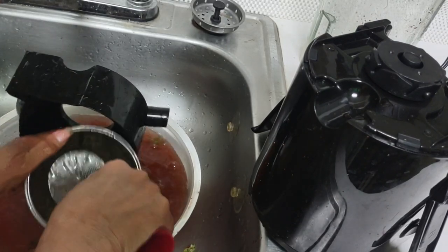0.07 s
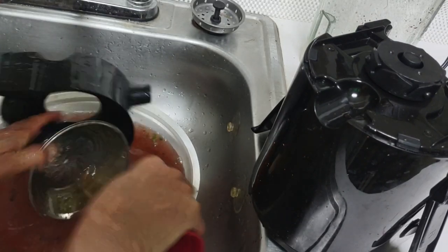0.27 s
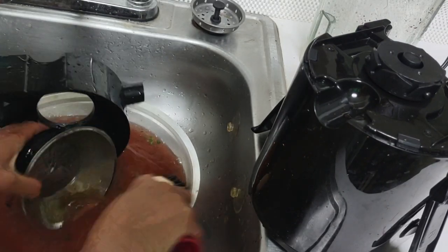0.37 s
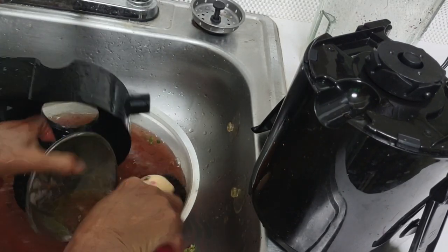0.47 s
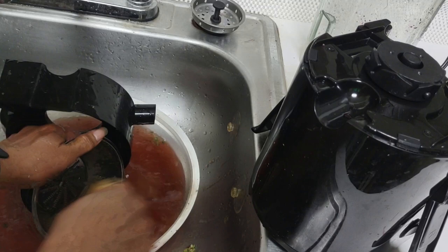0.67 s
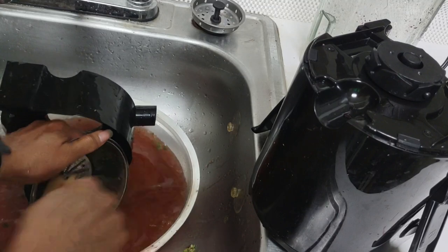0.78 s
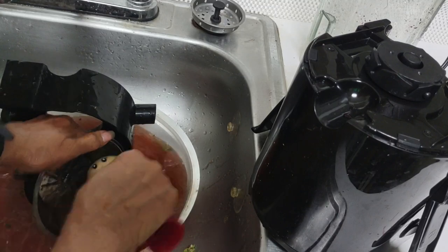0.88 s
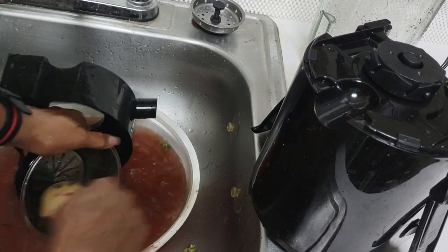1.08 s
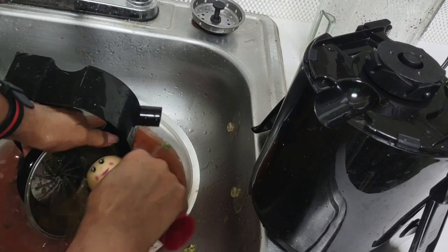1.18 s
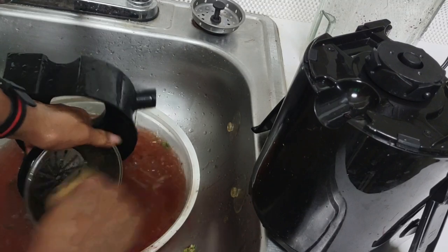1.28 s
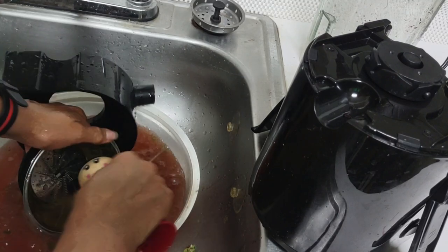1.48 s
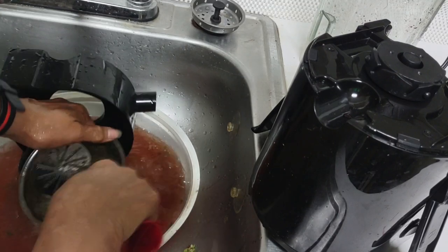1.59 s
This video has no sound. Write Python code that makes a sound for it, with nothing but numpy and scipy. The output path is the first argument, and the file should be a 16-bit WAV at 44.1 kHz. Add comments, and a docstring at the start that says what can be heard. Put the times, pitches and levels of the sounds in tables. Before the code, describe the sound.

A mesh basket is scrubbed by hand in a water-filled plastic basin inside a steel sink; hollow thumps and a loud early knock, then softer bumps, small sloshes, bubbles and short brush hisses, heard close, stronger on the right.

```python
"""Bristles hiss in strokes: a brush scrubs a mesh basket in a plastic basin of water in a steel sink.
Dense random flicks make the hiss; slips and bumps drive ringing modes of sink, basin, parts and basket.
Water churns as tiny ringing bubbles over gritty noise; single bubbles are dying sines, most rising in pitch.
The sink reverberates by feedback delays; the microphone's right side faces the work."""
import sys
import numpy as np
from scipy import signal
from scipy.fft import rfft, irfft
from scipy.io import wavfile

SR = 44100
rng = np.random.default_rng(int(sys.argv[2]) if len(sys.argv) > 2 else 0)


def store_wav(level_fs):
    """Save 16-bit WAV to argv[1]."""
    pcm = np.round(np.clip(np.atleast_2d(level_fs), -1, 1) * 32767)
    wavfile.write(sys.argv[1], SR, pcm.T.astype(np.int16))


N = 72765  # samples

# All table levels are relative, ahead of the *_DB trims.
# bristle hiss, three stretches: t/s, level/dB, top/dB, body/dB
BRUSH_STRETCHES = [
    [(0.0, -48, 3.5, 4.5), (0.02, -52.5, -3.5, -7.5), (0.042, -44, 1, -13), (0.062, -42, -7, -2),
     (0.078, -43.5, -6, -20), (0.116, -52.5, -3, 4), (0.136, -52.5, -0.5, -4), (0.174, -65.5, -11, 12),
     (0.2, -68.5, -9, 8), (0.236, -57.5, -17, 5.5)],
    [(0.41, -67.5, -9, 3), (0.464, -69, 6, 12), (0.522, -60, -4.5, -3), (0.54, -74, -9, -3),
     (0.578, -82, -5, 1), (0.618, -63.5, -26, 14), (0.65, -85, -20, 15), (0.654, -70.5, 1, 7),
     (0.714, -79, -5, 3.5), (0.764, -51.5, -10, -13), (0.782, -52, -3.5, -0.5), (0.838, -38.5, -6.5, -2),
     (0.898, -69.5, -6, 9), (0.962, -41.5, -12, 0), (0.98, -42, -13, 0), (1.0, -55, -6, -2)],
    [(1.0, -56.5, -9, 3), (1.058, -66, -12, 1), (1.11, -53.5, -3, 12), (1.122, -61, -9, 6),
     (1.164, -51, -18, 4.5), (1.218, -75, -5, -3), (1.244, -58, 0.5, 1), (1.274, -43.5, -5.5, -2.5),
     (1.356, -52.5, -4.5, -14.5), (1.384, -66.5, -9, 3), (1.416, -38, -6, -3.5), (1.488, -63, -12, -1),
     (1.522, -62.5, -3, -8), (1.544, -45.5, -5, -1), (1.576, -45, -5, -9), (1.65, -66.5, -3, -11)],
]
# bristle spectrum: f/Hz, density/dB per Hz
BRISTLE_SPECTRUM = [(590, -62), (1000, -2), (1260, -15.5), (1450, -1.5), (1590, -7), (2480, -1), (3810, -9),
                    (4320, -4), (9140, -7), (10700, -13.5), (15700, -8.5)]
FLICKS_PER_S, FLICK_SPREAD_DB, BRUSH_DB = 12000, 1.5, 3.5
SNAG_HZ, SNAG_DB = 69, 2  # bandwidth, rms swing

# parts dragging: t/s, boom/dB, ring/dB
DRAG_CURVE = [(0.0, -55, -59), (0.032, -59, -67), (0.09, -27.5, -28.5), (0.136, -41.5, -56),
              (0.16, -33, -34.5), (0.216, -44, -38.5), (0.252, -25, -16.5), (0.306, -29, -29.5),
              (0.33, -28, -40), (0.352, -24.5, -23.5), (0.426, -31.5, -39), (0.45, -21.5, -33),
              (0.592, -55.5, -71), (0.61, -57, -54), (0.638, -34.5, -52), (0.666, -35.5, -43),
              (0.752, -34, -40), (0.79, -41.5, -45.5), (0.836, -36, -35), (0.932, -36.5, -69),
              (0.978, -35, -41.5), (1.06, -45.5, -44), (1.098, -25.5, -35), (1.12, -30, -43),
              (1.222, -37, -56.5), (1.272, -39, -43.5), (1.446, -34.5, -43), (1.52, -68, -63),
              (1.566, -37, -53), (1.65, -72, -73)]
SLIPS_PER_S, SLIP_SPREAD_DB, DRAG_DB = 600, 2, -6.5

# bumps: t/s, ring/dB, boom/dB, clatter/dB, basket/dB, crack/dB
BUMP_LIST = [(0.082, -33, -37, -40.5, -58, -49), (0.157, -29.5, -44, -43.5, -59, -60),
             (0.222, -39, -28, -42.5, -54.5, -56), (0.245, -36, -32, -21, -21, -29.5),
             (0.248, -7, -23.5, -32, -39, -54), (0.253, -12, -23, -34, -26, -52),
             (0.33, -30, -22.5, -34, -50, -64), (0.349, -15, -28, -33, -45, -52),
             (0.384, -23.5, -36, -33, -44, -42.5), (0.432, -43, -22, -48, -67, -58.5),
             (0.443, -23, -19, -47, -71, -68), (0.463, -59, -22, -34.5, -68, -61),
             (0.601, -70, -72, -62, -61, -55), (0.612, -30.5, -30, -40.5, -48, -51),
             (0.635, -31.5, -30, -43, -66, -69), (0.655, -50, -33.5, -62, -68, -61),
             (0.707, -30, -29, -50, -68, -65), (0.744, -30, -35, -59, -65, -59),
             (0.756, -39, -32.5, -52, -59, -61), (0.824, -36, -35, -38, -40, -48),
             (0.895, -36.5, -65, -47, -67, -59), (1.086, -33.5, -36, -43.5, -63, -59),
             (1.1, -58, -24, -50, -57, -48), (1.123, -27, -27.5, -47, -59, -57),
             (1.139, -34.5, -38, -48, -64, -47.5), (1.315, -34, -50, -50, -51, -52.5),
             (1.357, -31.5, -38, -51, -65, -62), (1.414, -46, -35, -50, -47, -38),
             (1.436, -42, -39, -48.5, -43, -55), (1.543, -49, -41.5, -56.5, -42, -42)]
# sink floor modes: f/Hz, level/dB, t60/s
SINK_MODES = [(119.1, 3, .1), (146.8, 1.5, 0.08), (199, -2.5, 0.085), (81, -11, 0.023), (252.3, -10, 0.037)]
# basin modes: f/Hz, level/dB, t60/s
BASIN_MODES = [(397, 2, 0.11), (317.9, -3, .1), (371.4, -8.5, 0.082), (491, -9.5, 0.027),
               (533, -17.5, 0.21), (691.2, -23.5, 0.18), (889, -15, 0.036)]
# plastic part modes: f/Hz, level/dB, t60/s
PART_MODES = [(917, -6, .04), (1183, -13.5, 0.074), (1318, -9, 0.027), (1430, -17.5, .04),
              (1612, -5, 0.039), (1890, 1, 0.013), (2048, -14.5, 0.03), (2357, -9, 0.043),
              (2800, -16.5, 0.034)]
# mesh basket modes: f/Hz, level/dB, t60/s
BASKET_MODES = [(2950, -6, .06), (3060, -2, .08), (3160, -1, .13), (3270, -1, .15), (3380, -3, .15),
                (3500, -5, .13), (3770, -8, .07), (4340, -8, .08), (4910, -11, .07), (6100, -12, .06)]
# crack spectrum: f/Hz, density/dB per Hz
CRACK_SPECTRUM = [(1760, -21), (3000, 0.5), (3400, -1.5), (3770, -4.5), (5630, -18.5), (6160, -8.5),
                  (15700, -46)]
BOOM_DB, RING_DB, CLATTER_DB, BASKET_DB = -2.5, -5.5, -4, -13.5
SPLASH_DB, SPLASH_S, CRACK_DB, CRACK_S = -2.5, 0.01, 1, 0.0075  # levels, decay constants
SOFT_HZ, STRIKE_SPREAD_DB = 1200, 2.5
CONTACT_S, CONTACT_HZ = 0.0025, 7500

# single bubbles: t/s, peak/dB, start pitch/Hz, rise/octaves, t60/s (5 ms at least)
BUBBLE_LIST = [(0.055, -39, 2480, 0.37, 0.025), (.08, -30, 698, 0.11, 0.036),
               (.164, -34.5, 2086, 0.66, 0.041), (.172, -46, 490, 0.63, 0.13), (.204, -41, 1810, 0.26, .04),
               (.221, -31, 693, 0.11, 0.049), (.444, -33.5, 577, 0.31, 0.085),
               (0.467, -35, 1686, 0.024, 0.046), (.59, -55, 3140, 0.45, 0.058),
               (0.601, -34.5, 2550, 0.35, 0.015), (.642, -40, 954, 0.06, 0.044),
               (.718, -46, 700, 0.18, 0.037), (0.766, -39.5, 1200, 1, 0.059), (.79, -41, 2490, 0.27, 0.037),
               (0.828, -39, 1455, 0, 0.043), (0.851, -32, 2430, 0., 0.02), (.89, -39, 1200, 0.18, .03),
               (.897, -38, 650, 0.19, 0.064), (0.965, -50, 1410, 0, 0.032), (0.998, -41, 900, 0.027, 0.036),
               (1.068, -44, 1800, 0.33, 0.032), (1.088, -36, 1300, 0.27, 0.029),
               (1.109, -31.5, 3040, 0, 0.012), (1.266, -36.5, 2530, 0, .05), (1.27, -46, 519, 0, 0.034),
               (1.31, -37.5, 765, 0.036, 0.046), (1.335, -51, 1780, 0.039, 0.057),
               (1.406, -38, 2460, 0.14, 0.071), (1.445, -41, 686, 0.13, 0.077),
               (1.542, -36.5, 2060, 0.28, 0.028), (1.615, -44.5, 3000, 0.35, 0.026)]
RISE_S = 0.026

# water and grit churning: t/s, level/dB
SLOSH_CURVE = [(0.0, -64), (0.026, -71), (0.09, -44), (0.136, -62), (0.16, -41), (0.21, -48.5),
               (0.252, -32), (0.298, -42.5), (0.39, -35.5), (0.426, -46.5), (0.454, -39), (0.574, -102),
               (0.62, -45), (0.694, -62), (0.72, -44), (0.818, -59), (0.83, -47.5), (0.886, -55.5),
               (0.896, -48), (0.932, -56), (0.968, -47.5), (1.034, -59.5), (1.13, -42.5), (1.236, -68),
               (1.272, -43.5), (1.382, -62), (1.446, -47), (1.52, -84), (1.548, -55), (1.65, -71)]
# wash and splash spectrum: f/Hz, density/dB per Hz
WASH_SPECTRUM = [(290, -40), (500, -3.5), (538, -1), (572, -11.5), (807, -13), (2330, -15.5), (3390, -34),
                 (6000, -33.5), (7800, -69), (13200, -120)]
FIZZ_PER_S, FIZZ_CYCLES, FIZZ_SHARE, SLOSH_DB = 500, 11.6, 0.4, -1.9  # cycles to -60 dB

# room hush spectrum: f/Hz, density/dB per Hz
HUSH_SPECTRUM = [(30, -8), (160, 0), (340, -8), (540, -6), (700, -22), (4000, -29), (8000, -32),
                 (15700, -36)]
HUSH_DB = -60

# left side shading: f/Hz, level against right/dB
LEFT_SHADING = [(60, 1.5), (200, -2.5), (400, -1.5), (700, -5.5), (1290, -14), (2380, -10), (4400, -13.5),
                (8120, -14), (15000, -0.5)]
# power share reaching the left directly: f/Hz, share/0-1
DIRECT_SHARE = [(60, 1.), (450, .99), (700, .9), (1400, .35), (3100, .4), (6800, .25), (15000, .2)]
LEFT_LAG_S, SCATTER_S = 0.00019, 0.005
SINK_T60_S, SINK_DB, WALL_CUT_HZ = 0.38, -17.5, 3900  # t60 before wall dulling
BASS_CUT_HZ, CUTOFF_HZ = 66, 16150


def from_db(db):
    """Decibels to gain."""
    return 10 ** (np.asarray(db) / 20)


def rms_one(x):
    """Scale to unit power."""
    return x / np.sqrt(np.mean(x ** 2) + 1e-20)


def in_time(rows):
    """Columns of a curve, one value per sample."""
    s, *columns = np.transpose(rows)
    return [np.interp(np.arange(N) / SR, s, c) for c in columns]


def at_hz(points):
    """A spectrum table read at every transform bin, on a log frequency axis."""
    hz, value = np.transpose(points)
    bin_hz = np.arange(N + 1) * SR / (2 * N)
    return np.interp(np.log(bin_hz + 1), np.log(hz), value)


def colour(x, gain):
    """Filter by a gain per bin."""
    return irfft(rfft(x, 2 * N) * gain)[..., :N]


def lowpass(x, hz):
    """Second-order low-pass."""
    return signal.lfilter(*signal.butter(2, hz, fs=SR), x)


def grains(per_s, spread_db):
    """Random clicks of uneven size and sign; unit power."""
    sizes = from_db(spread_db * np.minimum(rng.exponential(1, N), 5))
    sizes = sizes * rng.choice([-1, 1], N)
    return rms_one(sizes * (rng.random(N) < per_s / SR))


def ring(drive, modes, spread_db=0.):
    """A drive excites every resonant mode of a body, each blow at its own random strength per mode."""
    out = np.zeros(N)
    hit = np.flatnonzero(drive)
    for k, (hz, db, t60_s) in enumerate(modes):
        radius = from_db(-60 / (max(t60_s, 0.005) * SR))
        w = 2 * np.pi * hz / SR
        push = drive + 1e-18  # avoids denormals
        push[hit] *= from_db(spread_db * rng.standard_normal(len(hit)))
        poles = [1, -2 * radius * np.cos(w), radius ** 2]
        out += (-1) ** k * from_db(db) * signal.lfilter([0, np.sin(w)], poles, push)
    return out


def impulses(db):
    """One click per bump."""
    clicks = np.zeros(N)
    clicks[(np.array(BUMP_LIST)[:, 0] * SR).astype(int)] = from_db(db)
    return clicks


def dying_noise(db, fade_s):
    """Noise that starts at each bump and decays exponentially."""
    fade = signal.lfilter([1], [1, -np.exp(-1 / (fade_s * SR))], impulses(db) + 1e-18)
    return fade * rng.standard_normal(N)


def burst(db, fade_s, spectrum):
    """A dying puff of noise at each bump, then coloured."""
    gain = from_db(at_hz(spectrum))
    return colour(dying_noise(db, fade_s), gain / np.sqrt(np.mean(gain ** 2)))


def chatter(db, modes):
    """A hard contact rattles for a moment, so every mode starts roughly."""
    return ring(dying_noise(db, CONTACT_S) / np.sqrt(CONTACT_S * SR / 2), modes)


def brush():
    """Dense bristle flicks over the mesh; body and top of the hiss change with pressure."""
    level_db, top_db, body_db = in_time(np.concatenate(BRUSH_STRETCHES))
    flicks = grains(FLICKS_PER_S, FLICK_SPREAD_DB)
    hiss = rms_one(colour(flicks, from_db(at_hz(BRISTLE_SPECTRUM))))
    top = signal.sosfiltfilt(signal.butter(3, 9500, "high", fs=SR, output="sos"), hiss)
    body = signal.sosfiltfilt(signal.butter(2, 4000, "low", fs=SR, output="sos"), hiss)
    middle = hiss - top - body
    shaped = middle + top * from_db(top_db + 4.5) + body * from_db(body_db - 0.5)
    return from_db(level_db + BRUSH_DB) * shaped


def snags():
    """Bristle tufts catch and let go: a quick random gain."""
    return from_db(SNAG_DB * rms_one(lowpass(rng.standard_normal(N), SNAG_HZ)))


def drag():
    """Uneven slips excite the modes of sink and basin."""
    out = np.zeros(N)
    for db, modes in zip(in_time(DRAG_CURVE), (SINK_MODES, BASIN_MODES)):
        slips = grains(SLIPS_PER_S, SLIP_SPREAD_DB)
        steady = ring(slips, modes)  # level reference
        out += ring(slips * from_db(db + DRAG_DB), modes, 1.94) / np.std(steady)
    return out


def bumps():
    """Each bump strikes sink, basin, parts and basket, with a crack and a short splash."""
    _, ring_db, boom_db, clatter_db, basket_db, crack_db = np.transpose(BUMP_LIST)
    boom = ring(impulses(boom_db + BOOM_DB), SINK_MODES, STRIKE_SPREAD_DB)
    basin = ring(impulses(ring_db + RING_DB), BASIN_MODES, 0.76)
    clatter = chatter(clatter_db + CLATTER_DB, PART_MODES)
    basket = chatter(basket_db + BASKET_DB, BASKET_MODES)
    splash = burst(clatter_db + SPLASH_DB, SPLASH_S, WASH_SPECTRUM)
    crack = burst(crack_db + CRACK_DB, CRACK_S, CRACK_SPECTRUM)
    return lowpass(boom + basin, SOFT_HZ) + lowpass(clatter + basket, CONTACT_HZ) + splash + crack


def bubbles():
    """Each bubble is a dying sine; its pitch climbs, by its rise, as it nears the surface."""
    out = np.zeros(N + SR)
    t = np.arange(SR // 5) / SR
    for s, db, hz, octaves, t60_s in BUBBLE_LIST:
        pitch_hz = hz * 2 ** (octaves * np.minimum(t / RISE_S, 1))
        phase = 2 * np.pi * np.cumsum(pitch_hz) / SR
        decay = from_db(db - 1 - 60 * t / max(t60_s, 0.005))
        onset = 1 - np.exp(-t / 0.0011)
        start = int(s * SR)
        out[start:start + len(t)] += decay * onset * np.sin(phase)
    return out[:N]


def slosh():
    """Churned water: random small bubbles, each ringing at one of 16 pitches, over a gritty wash."""
    pitches_hz = np.geomspace(550, 2600, 16)
    born = grains(FIZZ_PER_S, 3.)
    dealt = rng.integers(0, len(pitches_hz), N)
    fizz = np.zeros(N)
    for k, hz in enumerate(pitches_hz):
        fizz += ring(born * (dealt == k), [(hz, 0, FIZZ_CYCLES / hz)])
    wash = FIZZ_SHARE * rms_one(fizz) + grains(3000., 2.9)
    level = from_db(in_time(SLOSH_CURVE)[0] + SLOSH_DB)
    return level * rms_one(colour(wash, from_db(at_hz(WASH_SPECTRUM))))


def hush():
    """Room hush: two independent steady coloured noises."""
    noise = rng.standard_normal((2, N))
    return from_db(HUSH_DB) * rms_one(colour(noise, from_db(at_hz(HUSH_SPECTRUM))))


def sink(x):
    """Eight short feedback delays for each side, duller on every round."""
    w = np.arange(N + 1) * np.pi / N
    dull = 1 / (1 + 1j * w * SR / (2 * np.pi * WALL_CUT_HZ))
    sides = []
    for lags_s in rng.uniform(0.004, 0.016, (2, 8)):
        response = 0
        for k, lag_s in enumerate(lags_s):
            loop = from_db(-60 * lag_s / SINK_T60_S) * dull * np.exp(-1j * w * lag_s * SR)
            response = response + (-1) ** k * loop / (1 - loop)
        sides.append(response)
    return colour(x, np.array(sides))


def scattered(x):
    """The same sound by many reflected paths: a brief noisy smear."""
    t = np.arange(SR // 10) / SR
    smear = rng.standard_normal(len(t)) * np.exp(-t / SCATTER_S)
    return colour(x, rfft(smear / np.sqrt(np.sum(smear ** 2)), 2 * N))


def scene():
    """The right hears the work directly; the left late, shaded, partly from other spots by reflection."""
    solid, catch, room = drag() + bumps() + bubbles(), snags(), hush()
    work = solid + catch * brush() + slosh() + room[0]
    elsewhere = scattered(solid + catch * brush() + slosh() + room[1])
    share = np.clip(at_hz(DIRECT_SHARE), 0, 1)
    direct, indirect = np.sqrt(share), np.sqrt(1 - share)
    shade = from_db(at_hz(LEFT_SHADING))
    late = np.exp(-1j * np.arange(N + 1) * np.pi / N * LEFT_LAG_S * SR)
    left = colour(work, direct * late) + colour(elsewhere, indirect)
    heard = np.array([left, work]) + from_db(SINK_DB) * colour(sink(work), indirect)
    # expected magnitude of the two-side average, divided out to keep its tone
    middle = np.sqrt(np.abs(1 + shade * direct * late) ** 2 + shade ** 2 * (1 - share)) / 2
    return colour(heard, np.array([shade, np.ones(N + 1)]) / middle)


def record(dry):
    """The microphone drops the deep bass; the top is cut."""
    dry = signal.lfilter(*signal.butter(3, BASS_CUT_HZ, "high", fs=SR), dry)
    return signal.sosfilt(signal.cheby2(16, 70, CUTOFF_HZ, fs=SR, output="sos"), dry)


dry = scene()
out = record(dry)
store_wav(out)
```